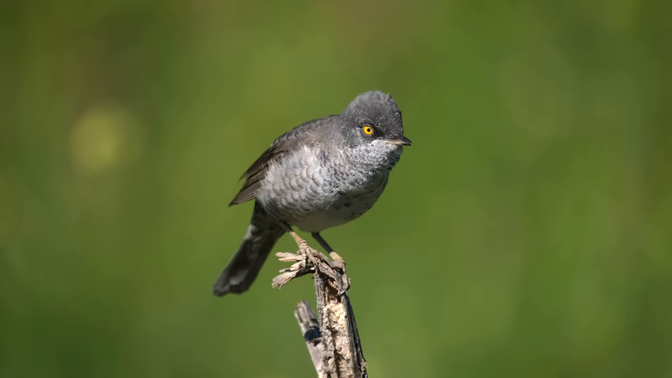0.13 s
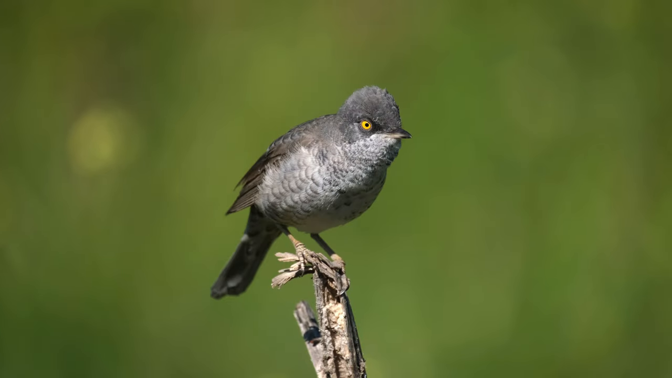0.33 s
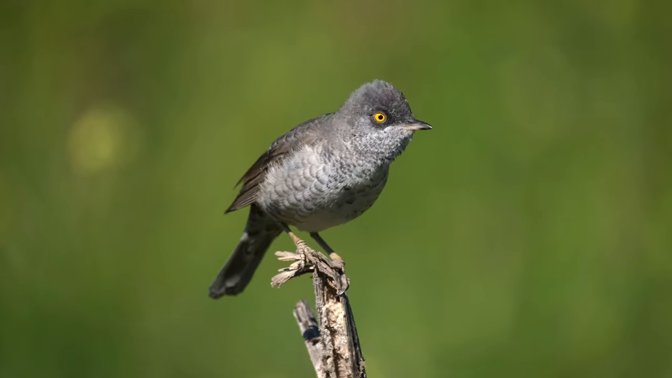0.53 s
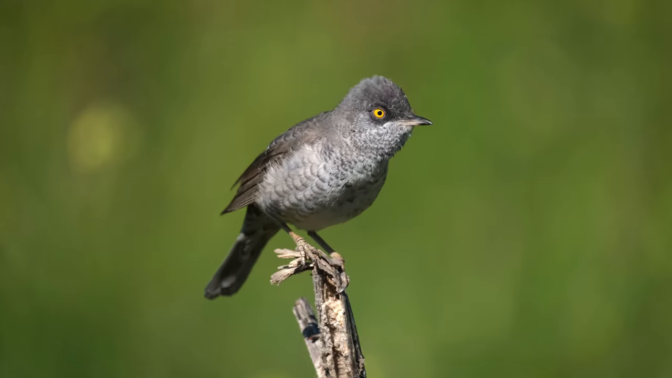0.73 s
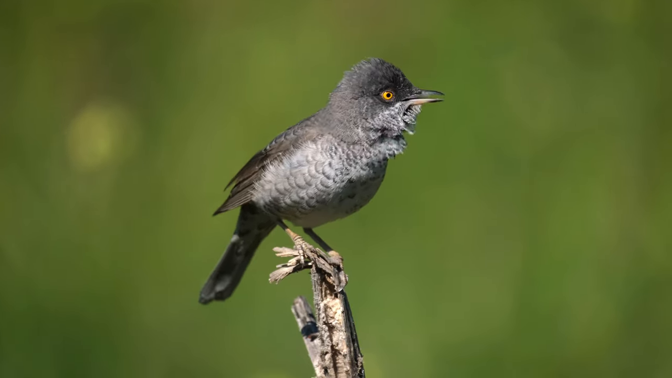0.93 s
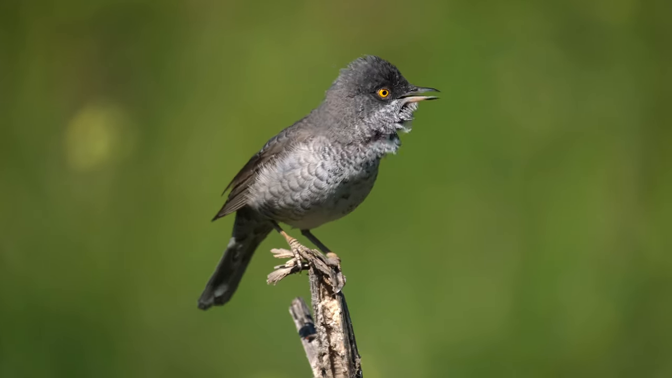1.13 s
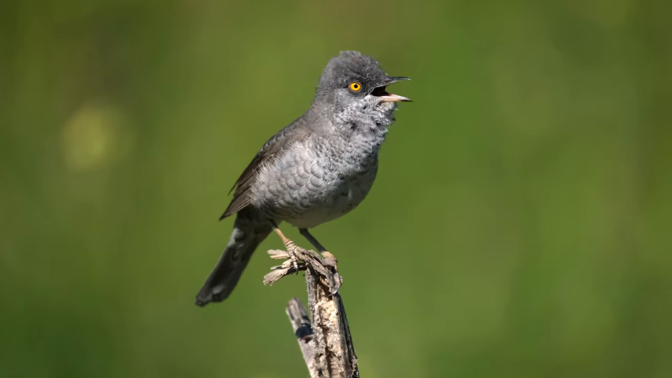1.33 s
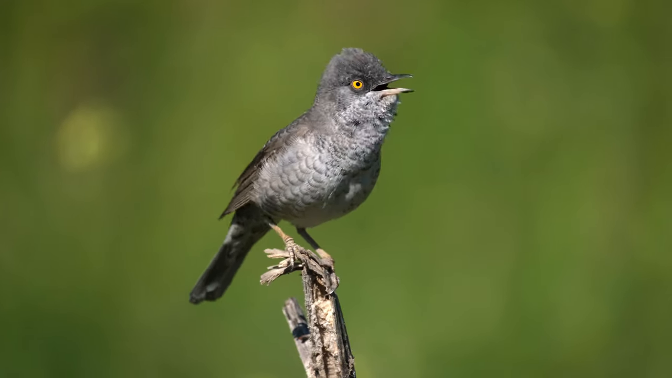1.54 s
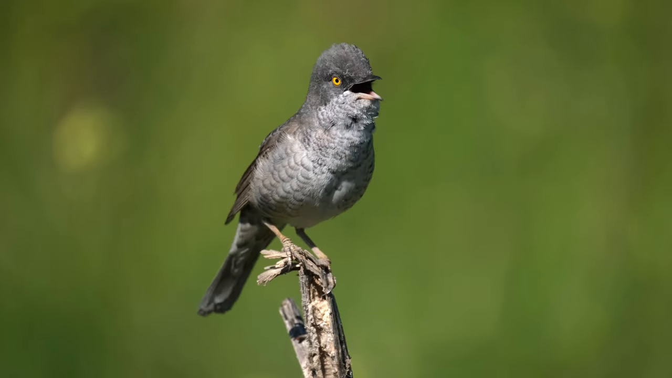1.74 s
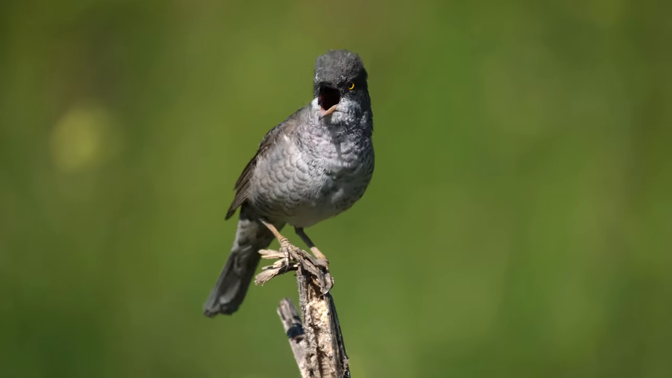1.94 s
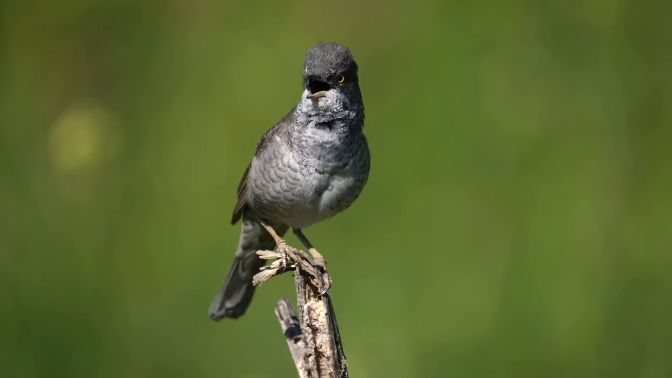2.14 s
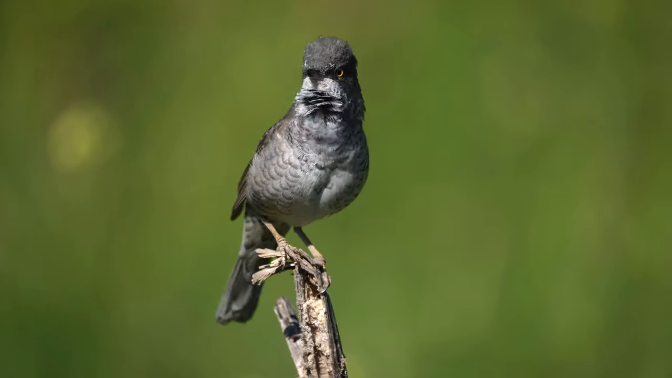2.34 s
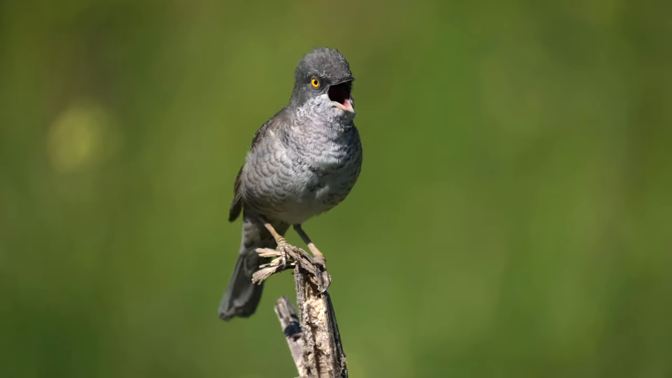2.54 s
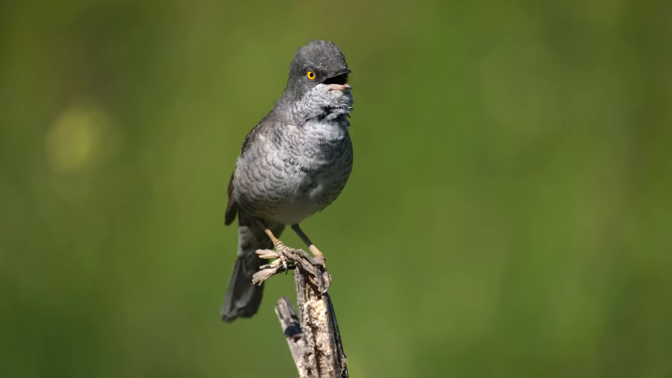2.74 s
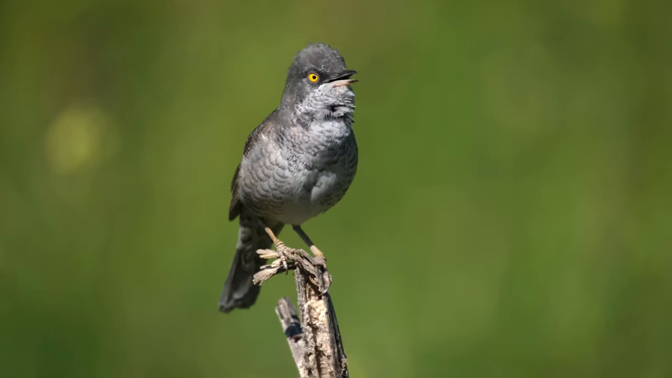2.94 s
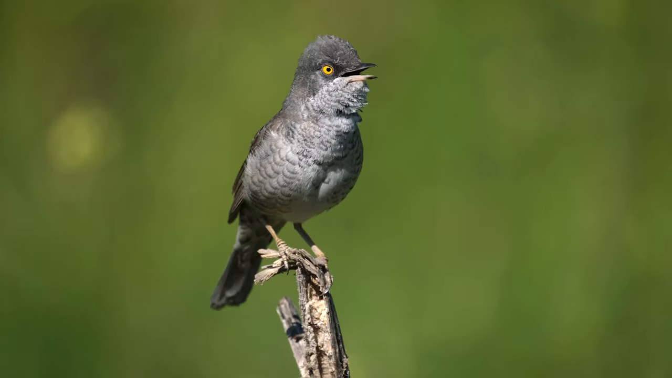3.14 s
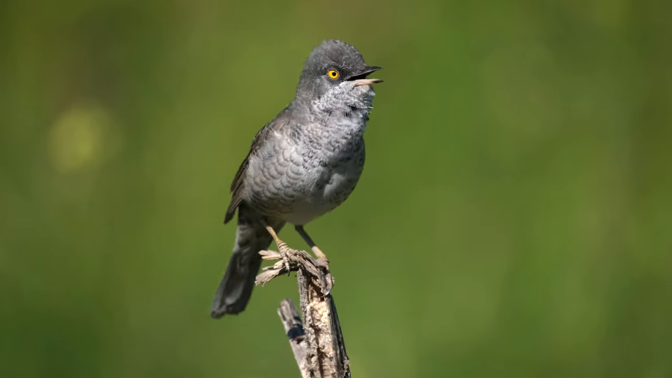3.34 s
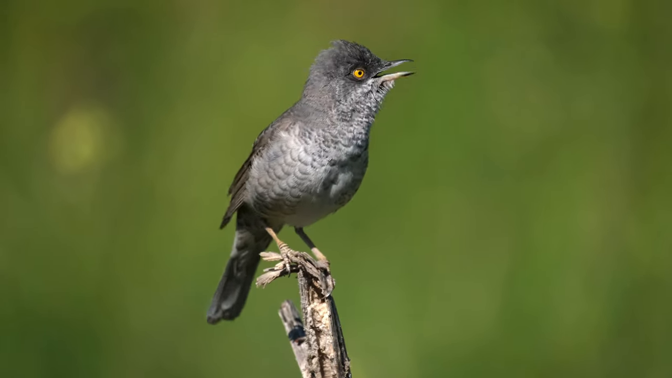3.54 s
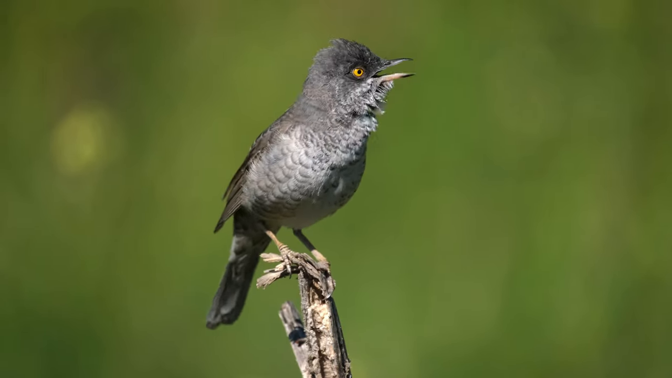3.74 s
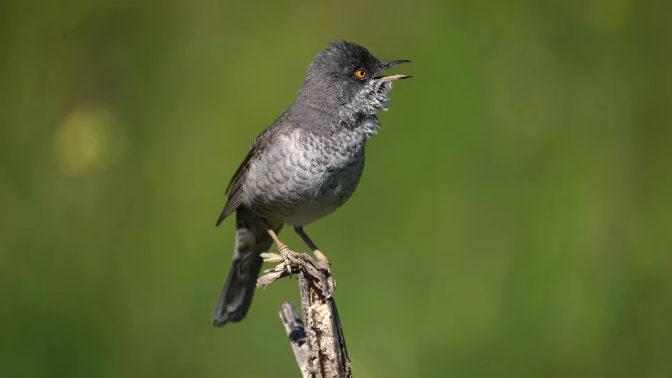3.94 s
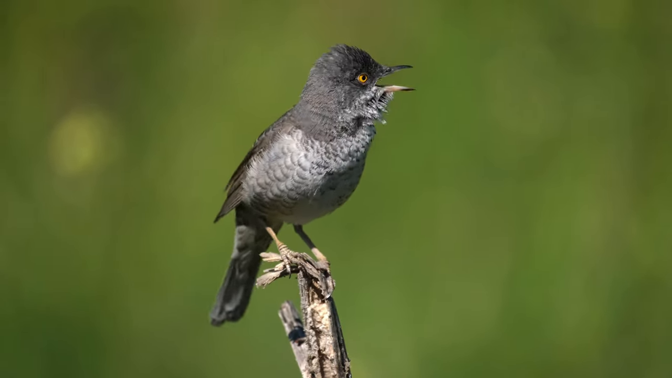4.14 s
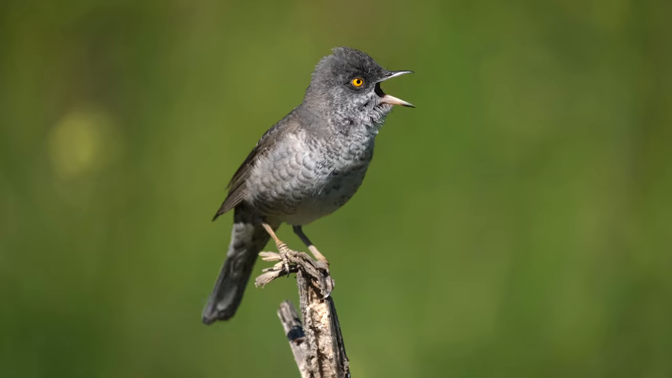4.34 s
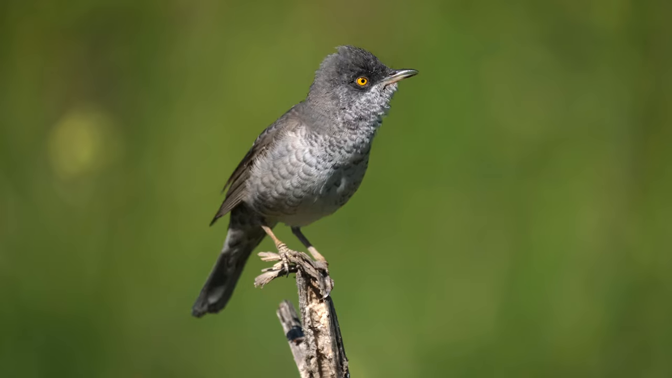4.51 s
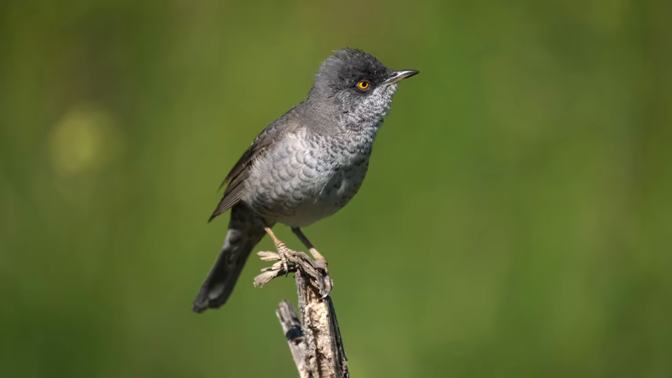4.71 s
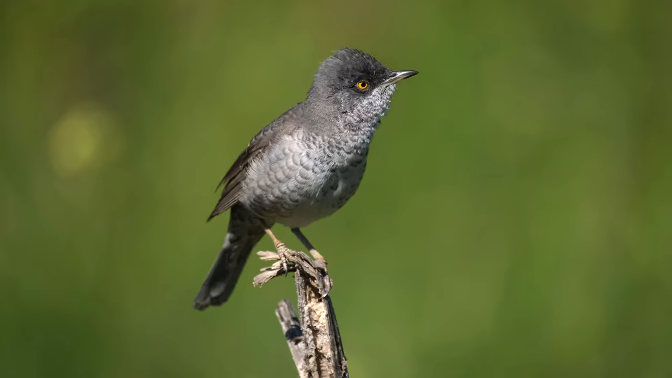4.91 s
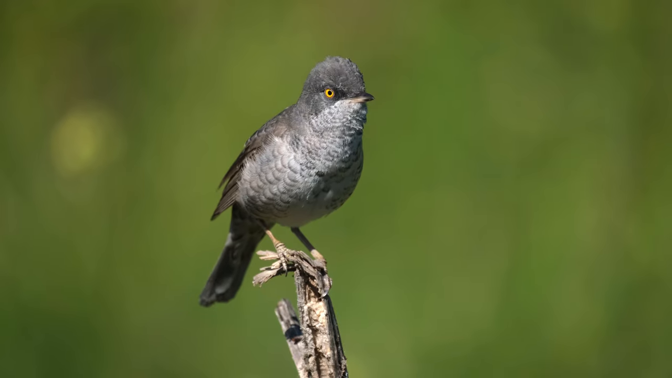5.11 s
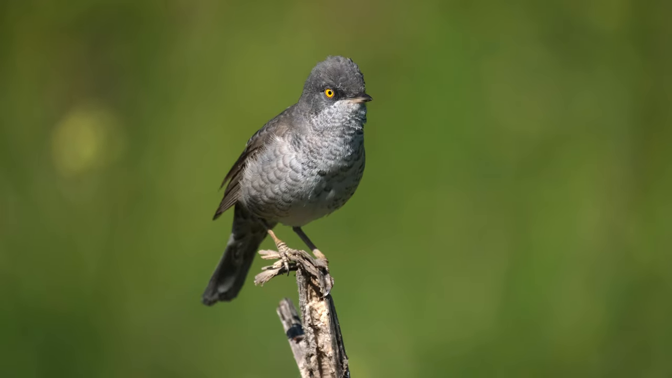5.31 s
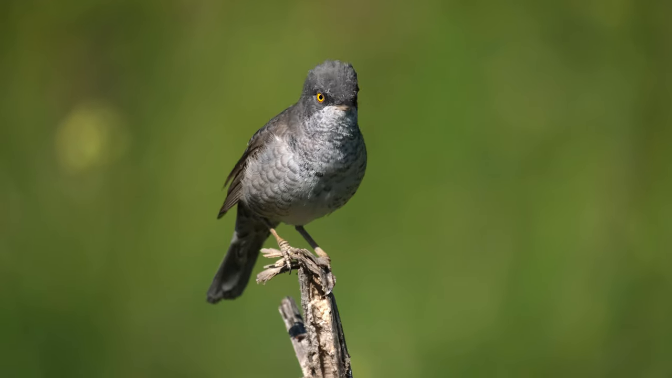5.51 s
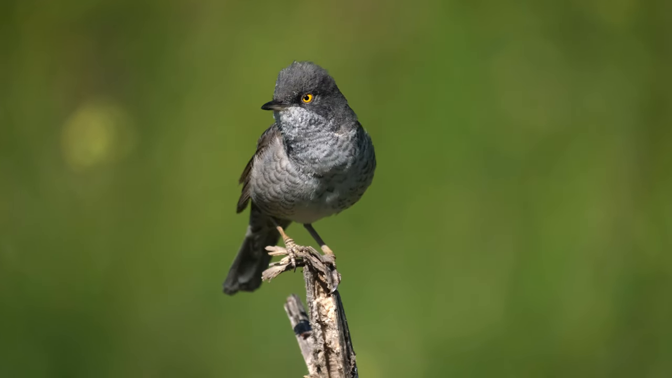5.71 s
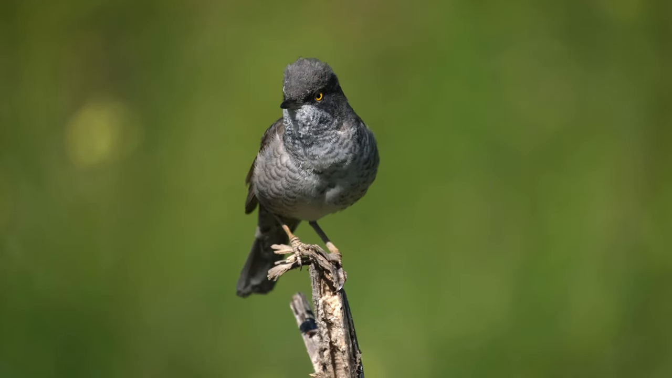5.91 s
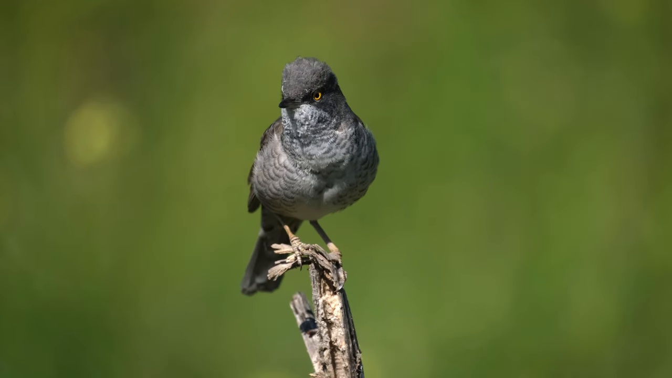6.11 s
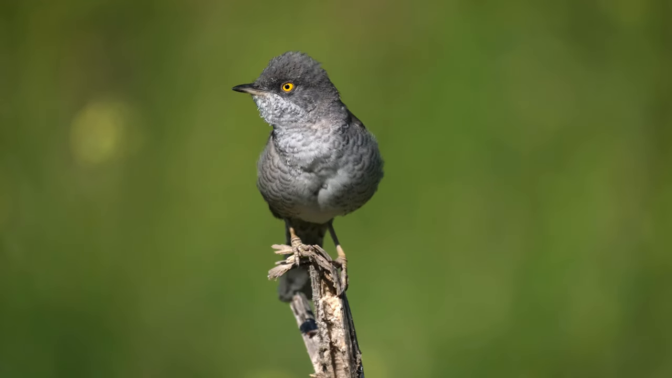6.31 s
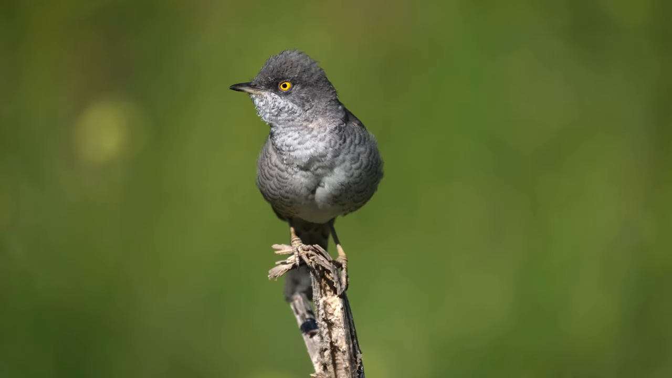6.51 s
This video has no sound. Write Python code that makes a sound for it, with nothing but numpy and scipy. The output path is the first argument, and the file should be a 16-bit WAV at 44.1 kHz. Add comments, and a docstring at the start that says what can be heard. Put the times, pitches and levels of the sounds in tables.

```python
"""A meadow murmurs all along, with a far drone that swells twice, made of shaped noise like the far birds.
First a few far birds call, and short noise bursts make something snap right at the microphone: a limiter ducks.
Then a warbler on a stump sings one fast phrase of whistles, trills and harsh notes, from sine tones of the
two sides of its voice organ (the syrinx), while bushes scatter the song back in noisy echoes.
Soft ticks and taps sound around the perch during and after the song, and far birds call again at the end."""
import sys
import numpy as np
from scipy import signal
from scipy.fft import rfft, irfft, next_fast_len
from scipy.io import wavfile
from scipy.ndimage import uniform_filter1d, map_coordinates

SR = 44100
rng = np.random.default_rng(int(sys.argv[2]) if len(sys.argv) > 2 else 0)


def transcribe(u):
    """Save the signal u as a 16-bit wav file named by the first command-line argument.

    u: samples, shape (n,) or (channels, n), limited to [-1, 1]; the rate is SR.
    q: integer samples, one column per channel.
    """
    v = np.clip(np.atleast_2d(u).T, -1, 1)
    q = np.round(v * 32767).astype(np.int16)
    wavfile.write(sys.argv[1], SR, q)


N = 289296
TIME = np.arange(N) / SR  # s
TOP_HZ = 15830  # nothing sounds above this

# Colour of the meadow's air: f/Hz, relative level/dB per Hz
MEADOW = [(15, -35), (25, 0), (53, -0.5), (152, -10), (331, -17.5), (457, -19), (552, -12), (848, -20.5),
          (1570, -21), (2120, -24), (3170, -25.5), (15500, -41.5)]
MEADOW_DB = -56.6
# How alike left and right are in the meadow: f/Hz, likeness/-1 to 1
ALIKE = [(60, 0.6), (180, 0.51), (550, 0.46), (1650, 0.28), (4970, -0.29), (15000, -0.75)]
# Loudness of the far drone: t/s, level/dB
DRONE = [(0, -70.5), (.55, -71), (.85, -59), (1.55, -57), (1.8, -67), (3.85, -67.5), (4.1, -59.5),
         (4.5, -53.5), (4.9, -70.5), (6.5, -66.5)]
# Bands of the drone: f/Hz, width/Hz, relative level/dB
DRONE_BANDS = [(334, 66.5, 0.5), (510.3, 43, -4.5)]
# Far birds: t/s, length/s, f/Hz, peak level/dB
FAR_BIRDS = [(0, 0.17, 2150, -62), (0.106, 0.1, 3550, -60), (0.329, 0.17, 3500, -63),
             (0.572, 0.21, 3460, -63.5), (4.8, .6, 2540, -79), (5.852, 0.46, 2160, -71.5)]
# How long leaves scatter the song: f/Hz, time to fall by 60 dB/s
BUSHES = [(500, 0.16), (3500, 0.32), (6000, .3), (12000, 0.048)]
# Soft ticks and taps around the perch: t/s, energy/dB, brightness f/Hz, time to fall by 60 dB/s
TAPS = [(1.153, -23.5, 900, 0.036), (1.547, -22, 246, .06), (1.976, -14.5, 1310, .02),
        (4.072, -21, 900, 0.035), (4.918, -36, 5000, 0.033), (5.127, -27, 199.7, .08)]
# Colour of the twig that a tap shakes: f/Hz, relative level/dB
TWIG = [(60, -9.5), (200, -4.5), (800, 2.5), (1600, -4), (4000, -20.5), (14000, -9.5)]
# Snaps at the microphone: t/s, energy on the right/dB, brightness f/Hz, time to fall by 60 dB/s
SNAPS = [(.1622, -0.5, 7037, 0.017), (.185, -2.5, 700, 0.06), (.1885, -5, 5020, 0.0046),
         (.1919, 17, 4200, 0.0055)]
# Colour of the microphone casing that a snap shakes: f/Hz, relative level/dB
CASING = [(80, -17), (400, -6.5), (1300, 0), (2000, -5.5), (3100, 6), (4200, 0), (5800, 5), (8000, -1),
          (15000, -9.5)]
# The head turns: t/s, left minus right level/dB
FACING = [(1.1, 1.5), (1.7, 1), (1.95, 3.5), (2.3, 3), (3.15, 2), (3.3, 4.5), (3.5, 3.5), (3.8, 2.5)]

# What the open beak lets out: f/Hz, level/dB
BEAK = [(5600, -0.5), (7400, -8.5), (10000, 2.5), (15000, -2.5)]
# Rough air in the throat: f/Hz, relative level/dB
TURBULENCE = [(1200, -14.5), (2900, 3.5), (4900, -0.5), (7500, -17), (15000, -24.5)]
# Faint overtones of the low side: multiple of the pitch, level/dB
OVERTONES = [(3, -44), (4, -54), (5, -51.5)]
# Extra tones when both sides sound: multiple of low pitch, multiple of high pitch, level/dB
MIXED = [(1, 1, -20), (-1, 2, -21), (2, -1, -34), (-1, 1, -33.5), (0, 2, -26.5), (2, 1, -29.5),
         (1, 2, -36.5), (0, 3, -35.5)]
# The throat's colour on these extra tones: f/Hz, level/dB
MIXED_COLOUR = [(1200, -3.5), (3000, 1), (4800, 2.5), (7500, -2.5), (10000, -4), (14000, 3.5)]
THROAT_HZ, THROAT_OCTAVES = 3856, .12  # the resonance that hooks and chips sweep through, and its half width
HIGH_JITTER = .007  # pitch unsteadiness of the high side, as a share

ALONG_NOTE = np.linspace(0, 1, 101)  # from the start of a note to its end
EDGE_DB = -20.5  # where short strokes begin and end, under their crest
# Trills: first crest t/s, end t/s, rate/Hz, first swing/Hz, last swing/Hz, throb/dB, sawtooth skew/0-1
TRILLS = [(0.917, 0.983, 77, 530, 384, 5.5, 0.3), (1.155, 1.222, 59.5, 524.7, 399.3, 5.5, 0),
          (1.478, 1.492, 140, 635, 198, 6, 0.6), (1.652, 1.666, 189, 491.6, 100, 5, 0.3),
          (1.863, 1.869, 230, 450, 452, 3.5, 0.4), (1.9165, 1.925, 180, 300, 402, 5.5, 0.38),
          (2.384, 2.497, 49, 296, 370, 1.5, 0.65), (3.0917, 3.199, 96, 194, 638, 5.5, 0.61),
          (3.9835, 4.006, 165, 495, 300, 6.5, 0.6)]
# Whistles: octave over fundamental/dB, roughness/dB, curve of (t/s, f/Hz, level/dB)
WHISTLES = [ (-19.5, -31, [(0.91, 2071, -47), (0.945, 2460, -32), (0.977, 2503, -31), (0.989, 2280, -32),
            (1.065, 2000, -34.5), (1.072, 1565, -64)]), (-45.5, -24, [(1.287, 4050, -43.5),
            (1.313, 4847, -17.5), (1.319, 4922, -27.5), (1.323, 7250, -39), (1.334, 6610, -48.5),
            (1.342, 4905, -25.5), (1.358, 4032, -17), (1.385, 3546, -18), (1.411, 3495, -19),
            (1.417, 3350, -45)]), (-32, -31.5, [(1.451, 2720, -48.5), (1.471, 3177, -18.5),
            (1.475, 3730, -20.5), (1.478, 2866, -24.5), (1.493, 2440, -26), (1.574, 2930, -18),
            (1.587, 2850, -44.5)]), (-42.5, -37, [(1.649, 2087, -49.5), (1.659, 1927, -31),
            (1.674, 2090, -22), (1.685, 2439, -21), (1.732, 1867, -25.5), (1.751, 1930, -28.5),
            (1.771, 2945, -18), (1.79, 3037, -15.5), (1.804, 2995, -22), (1.81, 2640, -43.5)]),
            (-35.5, -19.5, [(1.858, 2910, -44), (1.866, 3155, -23.5), (1.869, 4223, -32.5),
            (1.875, 4680, -32), (1.886, 4042, -22), (1.906, 4162, -21), (1.909, 4546, -39),
            (1.913, 5436, -41), (1.918, 3160, -21.5), (1.924, 2994, -26), (1.931, 3320, -46)]),
            (-38.5, -32.5, [(2.355, 2530, -54), (2.373, 2805, -19), (2.385, 2753, -23.5),
            (2.391, 1968, -27), (2.466, 1997, -28), (2.476, 2096, -41)]),
            (-37.5, -35.5, [(3.027, 1495, -61), (3.055, 1968, -29), (3.105, 2202, -23.5),
            (3.198, 2740, -24), (3.203, 2443, -33.5)]), (-40, -24, [(3.622, 2907, -56), (3.63, 3316, -30),
            (3.637, 6690, -35.5), (3.651, 5930, -29), (3.661, 6270, -34.5), (3.679, 4632, -22),
            (3.687, 4700, -22.5), (3.693, 3280, -30.5), (3.699, 3640, -40)]),
            (-33.5, -22.5, [(4.364, 3663, -41), (4.38, 3510, -27.5), (4.399, 4128, -16), (4.405, 3164, -30),
            (4.413, 2863, -34.5)]), ]
# Slurs: t/s, length/s, first f/Hz, middle f/Hz, last f/Hz, attack/s, first level/dB, last level/dB,
# octave over fundamental/dB, roughness/dB
SLURS = [(1.151, .089, 2112, 2317, 2670, 0.013, -30, -23.5, -14.5, -23),
         (2.064, .012, 1900, 1776, 1601, .005, -29, -31.5, 19, -9.5),
         (2.096, .12, 2540, 2940, 3240, 0.055, -15, -18.5, -35.5, -45.5),
         (2.258, .027, 3274, 3937, 4430, .012, -16, -21, -33.5, -27.5),
         (2.286, .045, 3220, 3408, 3474, 0.015, -15.5, -15.5, -28, -27),
         (3.98, .066, 3056, 2940, 2410, .028, -20, -26.5, -33.5, -26),
         (4.096, 0.0361, 1930, 2370, 2630, 0.0062, -25.5, -19.5, -31.5, -40)]
RELEASE_S, SAG = .007, .15  # a slur's breath runs out over this time, and its pitch sags by this share
# Zips: t/s, length/s, top f/Hz, level/dB, place of the loudest point/0-1, octave over fundamental/dB, roughness/dB
ZIPS = [(2.005, 0.019, 2914, -23, .55, 13.5, -11.5), (2.025, 0.018, 2960, -21.5, 0.3, 13.5, -14),
        (2.042, 0.021, 3040, -22, .35, 11, -10.5), (4.037, 0.018, 2237, -29.5, 0.5, -12, -26),
        (4.058, 0.0148, 2390, -23, 0.78, -22, -38), (4.078, 0.017, 2340, -24.5, .62, -21, -47)]
ZIP_FROM_HZ, ZIP_TO_HZ, ZIP_TURN = 1660, 1930, 0.72  # the turn comes at this share of the length
# Chips: t/s, level before the throat/dB, top f of the low side's curl/Hz
CHIPS = [(2.9065, -16, 4320), (2.9432, -16, 4743)]
# "Chit-chit-chee-ow": t/s, level/dB, first f of the closing fall/Hz, length of the chee/s, of the fall/s
CHEE_OWS = [(3.271, -17, 2445, .041, 0.047), (3.436, -17.5, 2255, .039, .045)]
CHEE_HZ, CHIT_S = 3246, .011  # the high side's middle pitch, and the time from chit to chit
# Rasps: t/s, crest t/s, end t/s, quiver rate/Hz, first f/Hz, low side level/dB, its fade/dB, high side level/dB
RASPS = [(3.749, 3.779, 3.806, 85, 1266, -30.5, -12, -21.5), (3.819, 3.845, 3.87, 90, 1840, -29, -1.5, -24),
         (3.871, 3.908, 3.945, 64, 1390, -28.5, -4, -25.5)]
RASP_LOW_HZ, RASP_HIGH_HZ = 1825, 3120
# Both sides whistle together: t/s, low f/Hz, low level/dB, high f/Hz, high level/dB
DUET = [(2.526, 3750, -46.5, 6170, -43), (2.535, 4555, -28, 7100, -44), (2.545, 4677, -19.5, 7660, -37),
        (2.551, 4400, -21, 6940, -52.5), (2.56, 3520, -31, 5300, -28.5), (2.571, 3302, -30, 4830, -30.5),
        (2.593, 3608, -29, 5106, -30.5), (2.616, 4150, -22.5, 5290, -30.5), (2.629, 4327, -35, 6860, -51)]
# Hooks: t/s, bottom of the dip t/s, first f/Hz, lead f/Hz, level before the throat/dB
HOOKS = [(4.176, 4.203, 3776, 4374, -16), (4.259, 4.285, 5450, 5475, -18),
         (4.4122, 4.44, 2770, 5665, -15.5)]
DIP_HZ, FLICK_HZ, HOOK_END_HZ, HOOK_STEP_S = 2930, 3660, 2520, .0145


def amp(db):
    """Turn decibels into gain."""
    return 10 ** (np.asarray(db) / 20)


def unit(x):
    """Scale to an rms loudness of 1."""
    return x / np.sqrt(np.mean(x ** 2) + 1e-20)


def along(points, hz):
    """Read between (frequency, value) points, spaced as the ear spaces pitch."""
    f, v = np.transpose(points)
    return np.interp(np.log(hz + 1), np.log(f + 1), v)


def curve(rows):
    """Join (time, value) rows with straight lines, one value a sample."""
    return np.interp(TIME, *np.transpose(rows))


def wobble(rate):
    """A smooth random curve with this many random points a second."""
    return map_coordinates(rng.standard_normal(N // 4), [TIME * rate], mode="wrap")


def filtered(x, response):
    """Weigh each frequency of x by the response."""
    size = x.shape[-1]
    m = next_fast_len(size + 8192)
    return irfft(rfft(x, m) * response(np.fft.rfftfreq(m, 1 / SR)), m)[..., :size]


def band(hz, width_hz):
    """Stereo noise gathered around one pitch, of rms 1."""
    noise = rng.standard_normal((2, N))
    return unit(filtered(noise, lambda f: 1 / (1 + (2 * (f - hz) / width_hz) ** 2)))


def air():
    """Soft noise over the field; a middle and a side part set how alike left and right are."""
    def parts(f):
        turn = np.arccos(np.clip(along(ALIKE, f), -1, 1)) / 2
        return amp(along(MEADOW, f)) * [np.cos(turn), np.sin(turn)]

    mid, side = filtered(rng.standard_normal((2, N)), parts)
    return unit(np.array([mid + side, mid - side])) * amp(MEADOW_DB + 0.24 * wobble(2.8))


def drone():
    """Narrow bands of noise hum far away and swell twice."""
    hum = sum(amp(db) * band(hz, width) for hz, width, db in DRONE_BANDS)
    return unit(hum) * amp(curve(DRONE))


def far_birds():
    """Distance blurs each call into a band of noise that swells and fades."""
    calls = np.zeros((2, N))
    for s, length, hz, db in FAR_BIRDS:
        arch = np.sin(np.pi * np.clip((TIME - s) / length, 0, 1))
        calls += amp(db) * arch * band(hz, 400)
    return calls


def meadow():
    """The murmur of air, drone and far birds together."""
    return air() + drone() + far_birds()


def late(x, s):
    """Delay a stereo sound by s seconds."""
    return np.pad(x, ((0, 0), (int(s * SR), 0)))[:, :N]


def bushes(x, near_db, far_db, far_delay=0.13):
    """Leaves scatter the song almost at once, and a farther hedge answers a moment later."""
    hz, t, z = signal.stft(rng.standard_normal((2, 2, SR // 2)), SR, nperseg=256)
    fading = z * amp(-60 * t / along(BUSHES, hz)[:, None])
    tails = signal.istft(fading, SR, nperseg=256)[1]
    near, far = signal.fftconvolve(x[None, None], tails / np.linalg.norm(tails[0, 0]), axes=2)[..., :N]
    return amp(near_db) * late(near, 0.0053) + amp(far_db) * late(far, far_delay)


def close_echoes(x, db=-18, delays=(.0019, .0028)):
    """Each microphone gets a reflection from close by, which beats against the fast sweeps."""
    return filtered(x, lambda f: 1 + amp(db) * np.exp(-2j * np.pi * np.outer(delays, f)))


def knocks(rows, body, apart):
    """Each contact is a very short burst of noise, coloured by the body that it shakes."""
    out, t = np.zeros((2, N)), np.arange(-256, 2048) / SR
    for s, db, bright_hz, t60 in rows:
        # shared noise in both ears, plus some of its own in each
        noise = rng.standard_normal(len(t)) + apart * rng.standard_normal((2, len(t)))
        push = noise * (t >= 0) * amp(-60 * np.abs(t) / t60)
        burst = filtered(push, lambda f: amp(along(body, f)) / np.hypot(1, f / bright_hz))
        burst /= np.linalg.norm(burst, axis=1, keepdims=True)
        out[:, round(s * SR) - 256:][:, :len(t)] += amp(db) * burst
    return out


def taps():
    """Soft contacts shake the twigs around the perch."""
    return knocks(TAPS, TWIG, apart=0.33)


def snaps():
    """Hard contacts shake the microphone casing, a little to the right."""
    return knocks(SNAPS, CASING, apart=1.6) * amp([[-5.5], [0]])


def resonance_db(hz):
    """How much of a pitch the throat lets through: most near its resonance."""
    return -10 * np.log10(1 + (np.log2(hz / THROAT_HZ) / THROAT_OCTAVES) ** 2)


def bend(first_hz, middle_hz, last_hz):
    """A smooth arc of pitch through three points."""
    return np.polyval(np.polyfit([0, .5, 1], [first_hz, middle_hz, last_hz], 2), ALONG_NOTE)


def stroke(start, length, hz, db, crest, throat_db):
    """A note (times, pitches, levels, (octave, roughness)) whose level arches over a crest."""
    away = np.interp(ALONG_NOTE, [0, np.clip(crest, .05, .95), 1], [1, 0, 1])
    return start + length * ALONG_NOTE, hz, db + EDGE_DB * away ** 2, throat_db


# Each figure below returns the notes of the low side, then those of the high side.
def whistles():
    """Tones of the low side alone, each with its own melody."""
    return [(*np.transpose(points), (octave_db, rough_db)) for octave_db, rough_db, points in WHISTLES], []


def slurs():
    """The low side's pitch bends once; as the breath runs out, level and pitch sag."""
    low = []
    for s, length, first_hz, middle_hz, last_hz, attack, first_db, last_db, *throat_db in SLURS:
        t = length * ALONG_NOTE
        release = np.clip((t - length) / RELEASE_S + 1, 0, 1)
        gate = np.clip(t / attack, .04, 1) * (1 - .95 * release ** 2)
        db = np.interp(t, [attack, length], [first_db, last_db]) + 20 * np.log10(gate)
        hz = bend(first_hz, middle_hz, last_hz) * (1 - SAG * release ** 2)
        low.append((s + t, hz, db, throat_db))
    return low, []


def zips():
    """Runs of three low-side strokes, each a quick rise of pitch and a quicker drop."""
    low = []
    for s, length, top_hz, db, crest, *throat_db in ZIPS:
        hz = np.interp(ALONG_NOTE, [0, ZIP_TURN, 1], [ZIP_FROM_HZ, top_hz, ZIP_TO_HZ])
        low.append(stroke(s, length, hz, db, crest, throat_db))
    return low, []


def chips(sweep_s=.017, curl_delay_s=.008, curl_s=0.024, curl_db=-5, off_resonance=0.79, throat_db=(-23.5, -16)):
    """The high side shoots up two octaves through the throat's resonance; the low side curls up after it."""
    low, high = [], []
    sweep_hz = bend(1750, 4250, 7400)
    for s, db, top_hz in CHIPS:
        curl_hz = np.minimum(bend(2150, top_hz, top_hz * 0.95), top_hz)  # levels off at the top
        low.append(stroke(s + curl_delay_s, curl_s, curl_hz, db + curl_db, .35, throat_db))
        sweep_db = db + off_resonance * resonance_db(sweep_hz)
        high.append(stroke(s, sweep_s, sweep_hz, sweep_db, 0.45, throat_db))
    return low, high


def chee_ows(chit_length_s=0.0096, first_chit_db=-6, chee_fade_db=-12, fall_db=-5, hum_db=-25,
             throat_db=(10, -20)):
    """Two chits and a fading tone on the high side; the low side hums under them, then falls harshly."""
    low, high = [], []
    for s, db, fall_hz, chee_s, fall_s in CHEE_OWS:
        for k, chit_db in enumerate([db + first_chit_db, db]):
            chit_hz = bend(2600, CHEE_HZ, 3550)
            high.append(stroke(s + k * CHIT_S, chit_length_s, chit_hz, chit_db, .5, throat_db))
        chee = s + 2 * CHIT_S
        fall = chee + chee_s
        fade_db = np.interp(ALONG_NOTE, [0, .08, .25, 1], [EDGE_DB, 0, -.6, chee_fade_db])
        high.append((chee + chee_s * ALONG_NOTE, bend(3240, CHEE_HZ, 3020), db + fade_db, throat_db))
        hum_level_db = np.full_like(ALONG_NOTE, db + hum_db)
        low.append((s + (fall - s) * ALONG_NOTE, bend(1900, 2300, 2180), hum_level_db, throat_db))
        swell_db = np.interp(ALONG_NOTE, [0, .1, .58, .8, 1], [-14, -6, 0, -5, EDGE_DB])
        falling_hz = bend(fall_hz, .885 * fall_hz, 1572)
        low.append((fall + fall_s * ALONG_NOTE, falling_hz, db + fall_db + swell_db, throat_db))
    return low, high


def rasps(scoop_s=0.014, high_lead_s=.022, quiver=0.13, throat_db=(10, -17)):
    """The low side starts harshly, the high side joins and climbs; around the crest both start to quiver and sink."""
    low, high = [], []
    for s, crest, end, rate, first_hz, low_db, fade_db, high_db in RASPS:
        t = s + (end - s) * ALONG_NOTE
        quivering = np.clip((t - crest) * rate * 2 + 1, 0, 1)
        shake = 1 + quiver * quivering * np.cos(2 * np.pi * rate * (t - crest))

        knots = [s, s + scoop_s, crest, end]
        low_hz = np.interp(t, knots, [first_hz, RASP_LOW_HZ, RASP_LOW_HZ, 1560]) * shake
        low_level_db = low_db + np.interp(t, knots, [-14, 0, fade_db, fade_db - 5])
        low.append((t, low_hz, low_level_db, throat_db))

        knots = [crest - high_lead_s, crest - high_lead_s / 2, crest - 1 / (4 * rate), crest + 1 / (2 * rate), end]
        high_hz = np.interp(t, knots, [2200, 2760, RASP_HIGH_HZ * .95, 2750, 2100]) * shake
        high_level_db = high_db + np.interp(t, knots, [EDGE_DB, -2, 0, -9, -21], left=-60)
        high.append((t, high_hz, high_level_db, throat_db))
    return low, high


def duet(throat_db=(-18.5, -19.5)):
    """Two whistles at once, whose pitches swing down and up together."""
    s, low_hz, low_db, high_hz, high_db = np.transpose(DUET)
    return [(s, low_hz, low_db, throat_db)], [(s, high_hz, high_db, throat_db)]


def churr(start_s=2.692, length=.15, first_crest_s=2.5, rate=25.3, swing_hz=310, throat_db=(-9, -15.5)):
    """Both sides sink in slow waves; the low side is stronger on the crests, the high side in the troughs."""
    t = start_s + length * ALONG_NOTE
    wave = np.cos(2 * np.pi * rate * (t - first_crest_s))
    edge = np.interp(ALONG_NOTE, [0, .05, .93, 1], [1, 0, 0, 1])  # 1 at both ends of the note
    low_hz = bend(2720, 2500, 1950) + swing_hz * wave
    high_hz = bend(3900, 3300, 2380) + swing_hz * wave - 1000 * edge * (1 - ALONG_NOTE)
    low_db = np.interp(ALONG_NOTE, [0, .35, 1], [-37, -31, -42]) + 6 * wave + EDGE_DB * edge
    high_db = np.interp(ALONG_NOTE, [0, .5, 1], [-21, -26.5, -35]) - 1.8 * wave + EDGE_DB * edge
    return [(t, low_hz, low_db, throat_db)], [(t, high_hz, high_db, throat_db)]


def hooks(rise_s=.01, drop_s=.0125, throat_db=(-35, -20)):
    """A lead tone dips, flicks up and falls; it is loudest near the throat's resonance."""
    low = []
    for s, dip, first_hz, lead_hz, db in HOOKS:
        flick, end = dip + HOOK_STEP_S, dip + 2 * HOOK_STEP_S
        t = s + (end - s) * ALONG_NOTE
        shoulder_hz = DIP_HZ + .14 * (FLICK_HZ - DIP_HZ)
        hz = np.interp(t, [s, s + rise_s, dip - drop_s, dip, (dip + flick) / 2, flick, flick + .005, end],
                       [first_hz, lead_hz, lead_hz, DIP_HZ, shoulder_hz, FLICK_HZ, 3200, HOOK_END_HZ])
        effort_db = np.interp(t, [s, s + 0.0053, dip, flick, end], [-18, -1, -2.5, 2.0, -4])
        low.append((t, hz, db + resonance_db(hz) + effort_db, throat_db))
    return low, []


def phrase():
    """Gather all notes of the low side and of the high side."""
    figures = [whistles(), slurs(), zips(), chips(), chee_ows(), rasps(), duet(), churr(), hooks()]
    return [sum(side, []) for side in zip(*figures)]


def trills(lag=2):
    """Pitch swing and throb; a skewed trill jumps up, slides down and is loudest on the way down."""
    swing, throb_db = np.zeros(N), np.zeros(N)
    for start, end, rate, first_hz, last_hz, db, skew in TRILLS:
        gate = np.clip(np.minimum(TIME - start + 0.0032, end + 0.0037 - TIME) / 0.0028, 0, 1)
        turn = 2 * np.pi * rate * (TIME - start)
        swing_hz = np.interp(TIME, [start, end], [first_hz, last_hz])
        swing += gate * swing_hz * np.cos(turn + skew * np.cos(turn))
        throb_db += gate * db * (np.cos(turn - lag * skew) - .2)
    return swing, throb_db


def turbulence(level, phase, glide_hz_per_s=110000, held=1.0):
    """Throat noise for one note: the membrane is least steady while its pitch glides."""
    glide = np.abs(np.gradient(np.gradient(phase))) * SR ** 2 / (2 * np.pi)  # Hz per s
    unrest = held + np.minimum(uniform_filter1d(glide, size=220) / glide_hz_per_s, 1)
    noise = unit(filtered(rng.standard_normal(len(level)), lambda f: amp(along(TURBULENCE, f))))
    return unrest * np.sqrt(np.abs(level) * level.mean()) * noise / 2


def gestures(notes, swing, throb_db, jitter=0.0064, shimmer_db=0.93):
    """Breath and tension give each note its samples, amplitude, phase, and octave and roughness gains."""
    drift = 1 + jitter * wobble(350)
    strength = amp(throb_db + shimmer_db * wobble(160))
    for s, hz, db, throat_db in notes:
        s = np.sort(s)
        at = np.arange(int((s[0] - .001) * SR), int((s[-1] + .001) * SR))
        pitch = uniform_filter1d(np.interp(TIME[at], s, hz), size=130) * drift[at] + swing[at]
        pressure = np.interp(TIME[at], s, amp(db), left=0, right=0)
        level = uniform_filter1d(pressure, size=70) * strength[at]
        yield at, level, 2 * np.pi * np.cumsum(pitch) / SR, amp(throat_db)


def low_voice(notes, rasp_db=-26, octave_fade=6.6):
    """Whistles with faint overtones; a throat tuned to the octave lets a harsher tone through."""
    sound, tone = np.zeros(N), np.zeros(N, complex)
    for at, level, phase, (octave, rough) in gestures(notes, *trills()):
        speed = np.gradient(phase)
        octave = octave * np.abs(speed.mean() / speed) ** octave_fade  # a rising octave leaves the resonance
        pure, harsh = 1 / np.hypot(1, octave), octave / np.hypot(1, octave)
        wave = pure * np.sin(phase) + harsh * np.sin(2 * phase)
        for k, db in OVERTONES:
            wave += (amp(db) + harsh * amp(rasp_db) * 2 / k) * np.sin(round(k) * phase)
        sound[at] += level * wave + rough * turbulence(level, phase)
        tone[at] += level * np.exp(1j * phase)
    return sound, tone


def high_voice(notes):
    """The other side adds a nearly pure, less steady tone."""
    sound, tone = np.zeros(N), np.zeros(N, complex)
    for at, level, phase, (_, rough) in gestures(notes, np.zeros(N), 0, jitter=HIGH_JITTER, shimmer_db=1.5):
        sound[at] += level * np.sin(phase) + rough * turbulence(level, phase)
        tone[at] += level * np.exp(1j * phase)
    return sound, tone


def mixed_tones(low, high):
    """Both sides sounding together modulate each other, which adds sum and difference tones."""
    mixed = np.zeros(N)
    for m, n, db in MIXED:
        mixed += amp(db) * np.sin(round(m) * np.angle(low) + round(n) * np.angle(high))
    return filtered(np.sqrt(np.abs(low * high)) * mixed, lambda f: amp(along(MIXED_COLOUR, f)))


def song():
    """Both sides and their mixed tones leave through the beak, which colours them."""
    low_notes, high_notes = phrase()
    low_sound, low = low_voice(low_notes)
    high_sound, high = high_voice(high_notes)
    throat = low_sound + high_sound + mixed_tones(low, high)
    return filtered(throat, lambda f: amp(along(BEAK, f)))


def scene():
    """The bird ahead, the snaps a little to the right, the meadow all around."""
    bird = song()
    facing = amp(np.outer([.5, -.5], curve(FACING)))
    direct = close_echoes(bird) * facing
    scattered = bushes(bird, near_db=-24.5, far_db=-31.0)
    return meadow() + scattered + taps() + snaps() + direct


def record(dry, recovery_db_per_s=38):
    """A limiter ducks at once on an overload and recovers slowly; then the top of the treble is cut."""
    over_db = 20 * np.log10(np.maximum(np.abs(dry).max(axis=0), 1))
    duck_db = np.maximum.accumulate(over_db + recovery_db_per_s * TIME) - recovery_db_per_s * TIME
    return filtered(dry * amp(-duck_db), lambda hz: hz < TOP_HZ)


dry = scene()
out = record(dry)
transcribe(out)
```